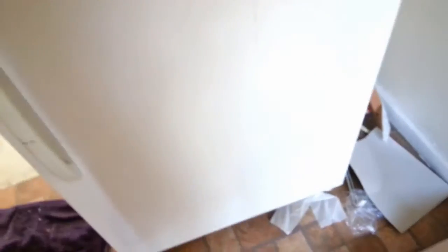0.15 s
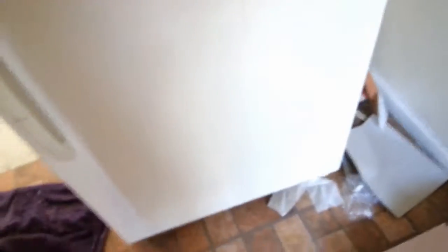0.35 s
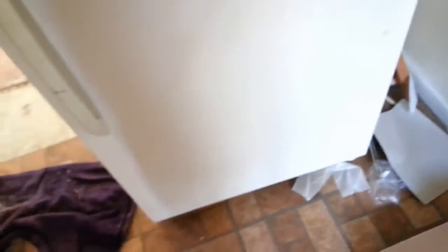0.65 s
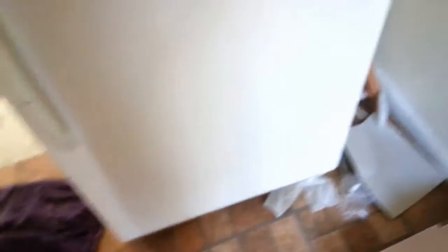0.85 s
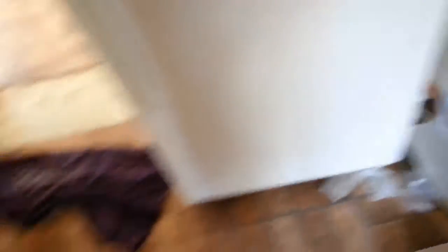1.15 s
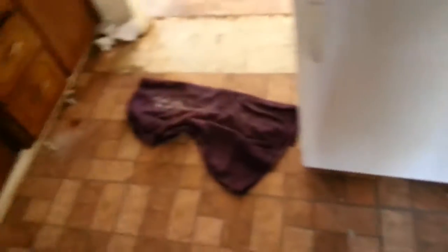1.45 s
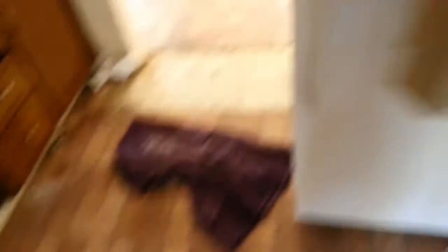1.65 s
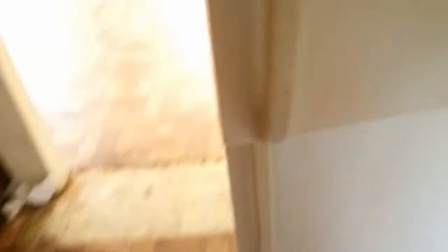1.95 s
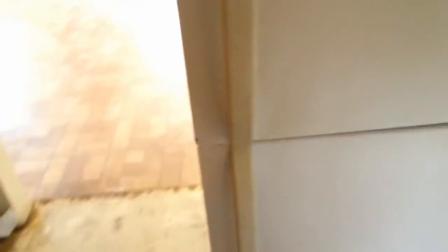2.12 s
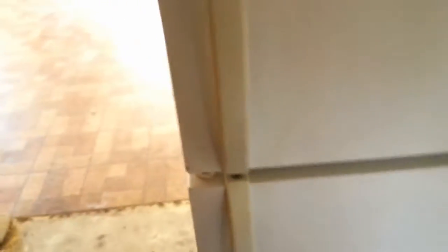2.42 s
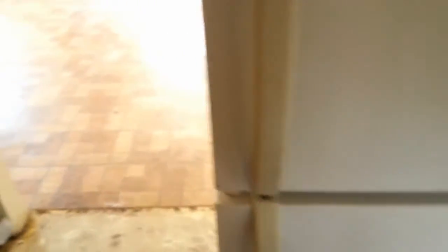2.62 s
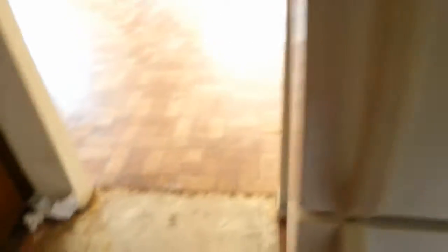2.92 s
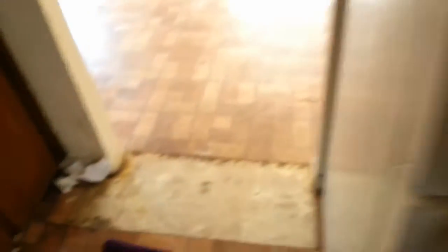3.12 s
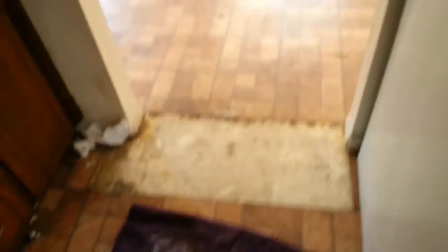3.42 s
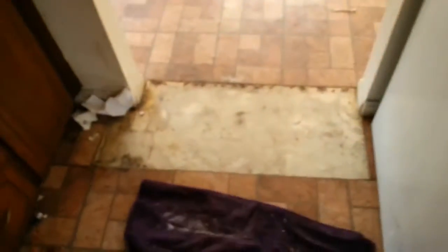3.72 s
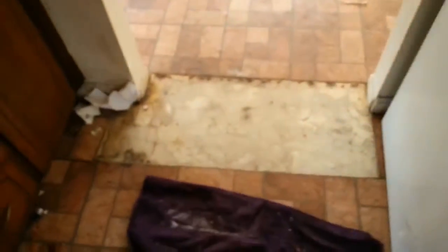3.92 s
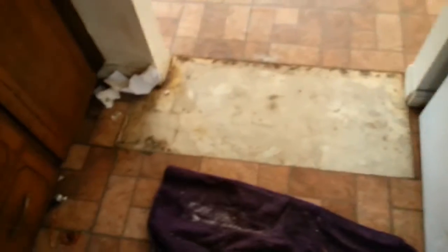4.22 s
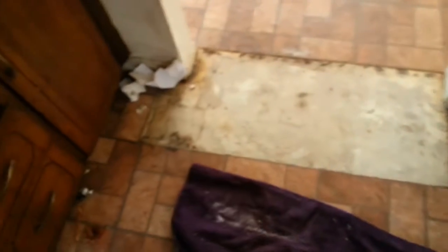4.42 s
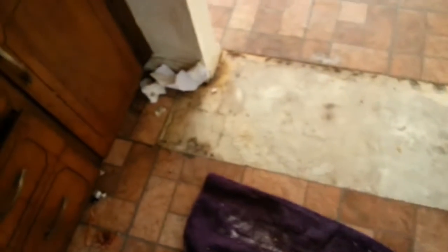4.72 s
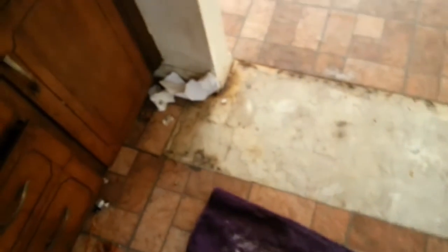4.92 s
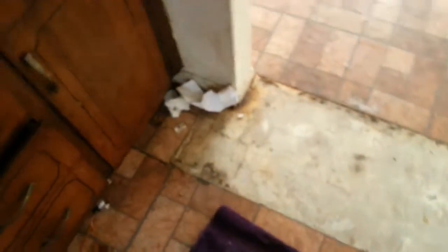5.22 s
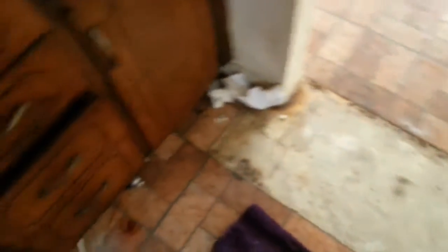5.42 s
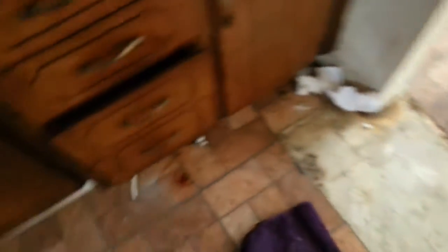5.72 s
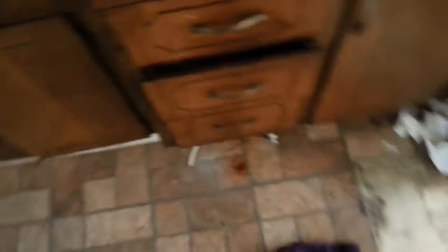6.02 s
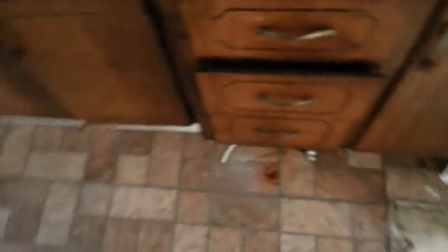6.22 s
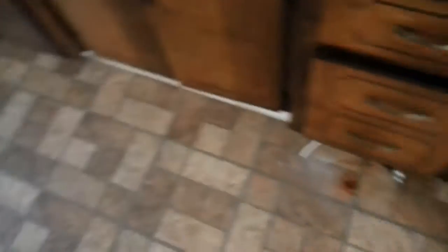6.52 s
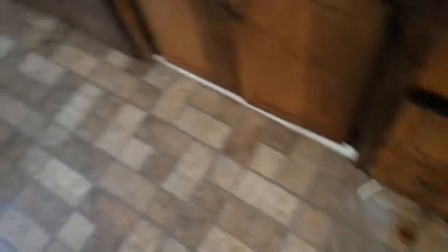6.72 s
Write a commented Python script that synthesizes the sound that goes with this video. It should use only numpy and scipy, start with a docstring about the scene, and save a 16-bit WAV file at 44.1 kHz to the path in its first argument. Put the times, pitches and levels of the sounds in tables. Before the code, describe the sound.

A refrigerator door knocks against its stop at arm's length and its plastic shelves clatter. A few soft bumps follow. About two seconds later the door slams shut, much louder, and the steel panels ring briefly in the bare kitchen. After that, someone shifts about on the vinyl floor with faint scuffs, small ticks and sleeve rustle over a low room hum.

```python
"""Fridge door in a bare kitchen

From arm's length, the door knocks against its stop and its plastic shelves clatter. Two seconds
later it slams on the steel cabinet, setting the panels and the room ringing. Someone shifts about
on the vinyl floor: faint bumps, scuffs, ticks and sleeve rustle over a low rumble and room tone."""
import sys
import numpy as np
from scipy import signal
from scipy.fft import rfft, irfft, next_fast_len
from scipy.io import wavfile

SR = 44100
rng = np.random.default_rng(int(sys.argv[2]) if len(sys.argv) > 2 else 0)


def dump_mix(stems):
    """Bounce the given channels to the path in sys.argv[1] as a 16-bit WAV at rate SR."""
    frames = np.atleast_2d(stems).T  # one column per channel
    limited = np.clip(frames, -1, 1)  # hard clip at full scale
    pcm = np.round(limited * 32767).astype(np.int16)
    wavfile.write(sys.argv[1], SR, pcm)


N = 302159
TAIL_SIZE = 9 * 2 ** 12   # samples for one hit and its decay

# How alike the room sounds left and right. Each row: frequency in Hz, correlation.
STEREO_LIKENESS = [(50, 0.53), (130, 0.74), (290, 0.7), (640, 0.45), (1400, 0), (14000, 0.011)]


def door_slam():
    """The door lands on the cabinet and settles; the steel panels ring on."""
    # The landing and its rebounds. Each row: start in seconds, level in dB.
    hits = [(2.3002, -2), (2.3020, 12.5), (2.3105, 0.5), (2.3158, 0), (2.3448, 2)]
    # Full-bodied tone of the slam. Each row: frequency in Hz, relative level in dB.
    colour = [(30, -17), (55, -17), (110, -9), (170, 2), (270, -1.5), (370, 0), (460, -1.5), (780, 1),
              (1080, -2), (1600, -8), (2200, -9.5), (3300, -13.5), (4100, -17.5), (5200, -24.5),
              (6100, -29), (14000, -43)]
    # Steel panel modes. Each row: frequency in Hz, level in dB, seconds to fall 60 dB.
    steel_modes = [(218, -8, 1), (270, -19, 0.72), (363, -8, 0.79), (415, 7.5, 0.32), (536, 5, 0.44),
                   (610, -7, 0.42), (670, -14, 0.4), (717, -3, 0.93), (720, -3, 0.6), (780, 1, 0.62),
                   (989, 12, 0.29), (1090, -2, 0.27), (1050, -1, 0.52), (1260, 3.5, 0.69),
                   (2380, -10.5, 0.9), (3200, -18, 0.36)]
    slam = impacts(hits, colour, shake_db=1.5, shake_t60=0.35, room_db=1, soft_hz=8900, spread_s=0.00043)
    return slam + ringing(hits, steel_modes, ring_db=-42)


def door_stop():
    """The door meets its stop with a quick double contact, heard as one knock."""
    # Each row: start in seconds, level in dB.
    hits = [(0.1741, -2.5), (0.1750, 5)]
    # Hard midrange tone of the knock. Each row: frequency in Hz, relative level in dB.
    colour = [(40, -14.5), (200, -12), (540, -8), (850, -0.5), (1150, 1), (1800, -7), (2150, -8),
              (2600, -6), (3700, -21), (4600, -12), (5250, -11), (6200, -27), (14000, -34.5)]
    return impacts(hits, colour, shake_db=3.5, shake_t60=0.45, room_db=-6, soft_hz=6000, spread_s=0.000636)


def shelf_clatter():
    """The door shelves jump and settle, ringing the plastic."""
    # Each row: start in seconds, level in dB.
    hits = [(0.2245, 4), (0.2275, 0), (0.2318, -12), (0.2374, 3), (0.2495, -6.5), (0.272, -21),
            (0.345, -10.5), (0.437, -32)]
    # Broad tone of the clatter. Each row: frequency in Hz, relative level in dB.
    colour = [(30, -54), (60, -13), (130, 0), (430, -3), (570, -0.5), (780, -5.5), (1500, -1.5), (1830, -3),
              (2150, -0.5), (3300, -6.5), (4500, -12.5), (9400, -18), (14000, -30.5)]
    # Shelf and door liner modes. Each row: frequency in Hz, level in dB, seconds to fall 60 dB.
    plastic_modes = [(317, -5, 1), (555, 8, 0.3), (950, -8, 0.39), (1361, 3.5, 0.57), (1470, -4, 0.43),
                     (2100, -17, .45), (2350, 3, 0.35), (2800, -13, 0.27), (3440, 3, 0.2)]
    clatter = impacts(hits, colour, shake_db=5.5, shake_t60=0.25, room_db=-4,
                      soft_hz=4000, spread_s=0.00054)
    return clatter + ringing(hits, plastic_modes, ring_db=-38)


def hinge():
    """The hinge rubs with a thin hiss as the door swings."""
    # Each row: moment of greatest speed in seconds, level in dB, swell in seconds.
    swings = [(0.98, -60, 0.18), (1.94, -67, .4)]
    # A narrow treble band. Each row: frequency in Hz, relative level in dB.
    colour = [(3000, -41), (4400, -14), (4900, -11), (5400, -28), (7000, -46)]
    return movement(swings, fade_s=0.078) * rubbing(colour, flutter_db=1.5)


def bumps():
    """Door, feet and floor bump softly: each touch eases in and wakes one broad resonance."""
    # Each row: start in seconds, level in dB, pitch in Hz, octaves from the peak to 7 dB down.
    touches = [(0.055, -13, 1020, 1.2), (0.078, -16, 322, 0.53), (0.346, -17, 134, 1.06),
               (0.656, -16, 220, 0.38), (0.671, -25, 840, 1.2), (0.970, -22.5, 530, 0.65),
               (1.812, -27.5, 290, 0.98), (1.95, -32.5, 1580, 0.56), (2.143, -22, 423, 0.93),
               (4.171, -30.5, 396, 1.14), (4.72, -33, 440, 0.91), (6.384, -41, 1380, 0.51)]
    hump_db = [-48, -24, -7, 0, -7, -24, -48]
    out, echoes = np.zeros((2, N)), from_db(-1.5) * kitchen_tail()
    for start_s, db, hz, octaves in touches:
        resonance = np.c_[hz * 2 ** (octaves * np.arange(-3, 4)), hump_db]
        touch = contact(shake_db=8, shake_t60=0.27, soft_hz=1200) * (1 - decay(0.01))
        add(out, start_s, from_db(db) * coloured(touch + echoes, resonance))
    return out


def floor_ticks():
    """Small sharp contacts crackle underfoot."""
    # Each row: start in seconds, level in dB.
    hits = [(3.279, -22), (4.272, -25), (4.308, -28), (5.178, -32), (5.186, -25), (5.212, -16),
            (5.221, -9.5), (6.188, -31), (6.284, -19), (6.295, -16), (6.302, -22), (6.311, -20),
            (6.320, -18), (6.3255, -23)]
    # Bright tone of a tick. Each row: frequency in Hz, relative level in dB.
    colour = [(60, -49), (400, -0.5), (900, -1.5), (1600, 6), (2400, 7.5), (3300, 7), (4600, 4.5),
              (5700, -7), (9500, -10), (14000, -46)]
    return impacts(hits, colour, shake_db=1.5, shake_t60=0.038, room_db=-5,
                   soft_hz=7000, spread_s=0.00021)


def sole_scuffs(fade_s=0.16, rasp_db=6.5, rasp_octaves=0.59):
    """A sole slides, gathers pressure and lets go with its own rasp; a faint shuffle fills the gaps."""
    # Each row: peak time in seconds, level in dB, swell in seconds, rasp pitch in Hz.
    slides = [(2.96, -65, .06, 2000), (3.283, -44, 0.027, 3460), (4.275, -49.5, 0.092, 2030),
              (4.61, -55.5, 0.17, 2830), (4.725, -54.5, 0.049, 1230), (5.182, -45.5, 0.014, 2240),
              (5.225, -58, 0.052, 3000), (5.29, -70, 0.12, 1720), (5.41, -44, 0.22, 1450),
              (6.108, -58.5, 0.04, 1100), (6.30, -49, .05, 4200), (6.395, -53.5, 0.12, 2500)]
    # Sole on vinyl. Each row: frequency in Hz, relative level in dB.
    colour = [(150, -18), (350, -6), (800, 1.5), (1400, -2.5), (2000, -3), (2600, -7), (4600, -7.5),
              (5700, -17), (14000, -19)]
    friction = rubbing(colour, flutter_db=3)
    out = movement([], fade_s, rest_db=-60) * friction
    for peak_s, db, swell_s, hz in slides:
        hump = np.c_[hz * 2 ** (rasp_octaves * np.array([-1, 0, 1])), [0, rasp_db, 0]]
        rasp = unit_energy(coloured(friction, hump)) * np.sqrt(N)
        out += movement([(peak_s, db, swell_s)], fade_s) * rasp
    return out


def sleeve_rustle():
    """Sleeves brush close by; the cloth is never quite at rest."""
    # Each row: peak time in seconds, level in dB, swell in seconds.
    brushes = [(0.44, -47.5, 0.039), (0.61, -57.5, 0.44), (1.96, -57.5, .35), (2.615, -42, 0.034),
               (3.29, -60, 0.037), (4.62, -52.5, 0.062), (5.05, -52.5, 0.074), (5.20, -50.5, 0.074),
               (5.475, -47.5, 0.35), (6.295, -54.5, 0.1), (6.41, -67, .05)]
    # Airy cloth hiss. Each row: frequency in Hz, relative level in dB.
    colour = [(1500, 5.5), (4500, 5), (6000, -3), (8500, -0.5), (14000, -5)]
    return movement(brushes, fade_s=0.17, rest_db=-64) * rubbing(colour, flutter_db=3, flutter_count=200)


def floor_rumble():
    """The floor rumbles under shifting weight."""
    # Each row: peak time in seconds, level in dB, swell in seconds.
    treads = [(0.69, -55, 0.086), (2.0, -56, 0.43), (3.7, -67, 0.4), (4.3, -67.5, 0.46), (5.85, -65, 0.28)]
    # Deep tone of the floor. Each row: frequency in Hz, relative level in dB.
    colour = [(15, -54), (35, -10), (55, 8), (95, 9), (140, -12), (300, -42)]
    return movement(treads, fade_s=0.76, rest_db=-72, fidget=0.091) * rubbing(colour, flutter_db=1.5)


def kitchen_tail(build_s=0.0033):
    """Dense wall echoes build up, then die away, the treble first."""
    # Each row: frequency in Hz, seconds to fall 60 dB.
    reverb_times = [(100, 0.55), (1200, 0.96), (3200, 0.79), (6500, 0.73), (13000, 0.31)]
    noise, hz = rfft(diffuse(TAIL_SIZE)), bins(TAIL_SIZE)
    centres, t60s = np.transpose(reverb_times)
    bands = [at_hz(np.c_[centres, weights], hz) for weights in np.eye(len(centres))]
    tail = sum(irfft(noise * band) * decay(t60) for band, t60 in zip(bands, t60s))
    return unit_energy(tail * (1 - decay(np.log(1000) * build_s)))


def room_tone():
    """A steady bed of low, diffuse noise."""
    # Each row: frequency in Hz, relative level in dB.
    colour = [(20, -44), (60, -35), (100, -7), (145, -3), (185, -7.5), (228, 0.5), (262, -7), (300, -4),
              (420, -10), (700, -12.5), (1000, -16.5), (2400, -21), (4700, -25.5), (5800, -30.5),
              (14500, -28.5)]
    return from_db(-53.5) * coloured(diffuse(N), colour)


def impacts(hits, colour, shake_db, shake_t60, room_db, soft_hz, spread_s):
    """A run of contacts on one object, each with its own shake and room echoes."""
    out = np.zeros((2, N))
    for start_s, db in hits:
        hit = contact(shake_db, shake_t60, soft_hz, spread_s) + from_db(room_db) * kitchen_tail()
        add(out, start_s, from_db(db) * hit)
    return coloured(out, colour)


def contact(shake_db, shake_t60, soft_hz, spread_s=0.0009, lag_s=0.00011):
    """One touch: a rounded click that reaches the right side first, and the brief shake it starts."""
    hz = bins(TAIL_SIZE)
    # Low bending waves travel slower; spread_s is the delay at 1 kHz.
    bending_phase = 4 * np.pi * spread_s * np.sqrt(hz * 1000)
    lag_phase = 2 * np.pi * hz * lag_s * np.array([[1], [0]])
    click = irfft(np.exp(-1j * (bending_phase + lag_phase)) / (1 + 1j * hz / soft_hz))
    shake = unit_energy(diffuse(TAIL_SIZE) * decay(shake_t60))
    return click * decay(1) + from_db(shake_db) * shake


def ringing(hits, modes, ring_db):
    """The hardest hit sets the panels ringing; higher modes reach the two sides further out of step."""
    ring, t = np.zeros((2, TAIL_SIZE)), np.arange(TAIL_SIZE) / SR
    for hz, mode_db, t60 in modes:
        phase_gap = np.arccos(at_hz(STEREO_LIKENESS, hz)) * rng.choice([-1, 1])
        phase = phase_gap * np.array([[0.5], [-0.5]]) + rng.uniform(0, 2 * np.pi)
        ring += from_db(mode_db) * np.sin(2 * np.pi * hz * t + phase) * decay(t60)
    out = np.zeros((2, N))
    start_s, db = max(hits, key=lambda hit: hit[1])
    add(out, start_s, from_db(db + ring_db) * ring * (1 - decay(0.062)))   # soft attack
    return out


def rubbing(colour, flutter_db, flutter_count=400):
    """Friction noise whose level flutters as the surfaces catch."""
    catch = np.interp(np.arange(N), np.linspace(0, N, flutter_count), rng.standard_normal(flutter_count))
    return from_db(flutter_db * catch) * coloured(diffuse(N), colour)


def movement(strokes, fade_s, rest_db=-120, fidget=0.87):
    """Envelope: each stroke rises 20 dB per swell time, falls 20 dB per fade_s; fidgets fill the gaps."""
    # Restlessness between moves. Each row: time in seconds, level in dB before scaling by fidget.
    restlessness = [(0.7, 2), (1.25, -23.5), (1.7, -15), (2.2, 1.5), (2.9, 2.5), (3.6, -5.5), (4.05, -15),
                    (4.4, -15), (5.3, -2), (5.85, -19), (6.5, -9)]
    t = np.arange(N) / SR
    power = from_db(rest_db + fidget * np.interp(t, *np.transpose(restlessness))) ** 2
    for peak_s, db, swell_s in strokes:
        drop_db = 20 * np.maximum((peak_s - t) / swell_s, (t - peak_s) / fade_s)
        power += from_db(db - drop_db) ** 2
    return np.sqrt(power)


def diffuse(size):
    """Stereo white noise from all directions: alike in the bass, unrelated in the treble."""
    padded = 2 * next_fast_len(size // 2 + 1)
    mid, side = rfft(rng.standard_normal((2, padded)))
    alike = at_hz(STEREO_LIKENESS, bins(padded))
    spectrum = np.sqrt((1 + alike) / 2) * mid + np.sqrt((1 - alike) / 2) * side * [[1], [-1]]
    return irfft(spectrum)[:, :size]


def coloured(x, colour, size=8192):
    """Minimum-phase EQ that keeps the power of white noise."""
    cepstrum = irfft(np.log(from_db(at_hz(colour, bins(size)))))
    cepstrum[1:size // 2] *= 2
    cepstrum[size // 2 + 1:] = 0
    response = unit_energy(irfft(np.exp(rfft(cepstrum))))
    return signal.oaconvolve(x, response[None], axes=1)[:, :x.shape[1]]


def decay(t60):
    """Envelope that falls 60 dB in t60 seconds."""
    return np.exp(-np.log(1000) * np.arange(TAIL_SIZE) / SR / t60)


def from_db(db):
    """Decibels to gain."""
    return 10 ** (np.asarray(db) / 20)


def at_hz(points, hz):
    """Read a curve on a log-frequency axis."""
    known_hz, values = np.transpose(points)
    return np.interp(np.log(hz + 0.0011), np.log(known_hz), values)


def bins(size):
    """Frequencies of a real spectrum, in Hz."""
    return np.arange(size // 2 + 1) * SR / size


def unit_energy(x):
    """Scale to an average energy of one per channel."""
    return x / np.sqrt(np.mean(np.sum(x ** 2, axis=-1)))


def add(track, start_s, sound):
    """Mix a sound into the track at start_s."""
    start = round(start_s * SR)
    track[:, start:start + sound.shape[1]] += sound[:, :N - start]


def scene():
    """The door up front, small movements around it and room tone underneath."""
    door = door_stop() + shelf_clatter() + door_slam() + hinge()
    soft_bumps = bumps()
    feet = (floor_ticks() + sole_scuffs()) * from_db([[0.47], [-0.47]])   # a little to the left
    return door + soft_bumps + feet + sleeve_rustle() + floor_rumble() + room_tone()


def record(dry):
    """A small microphone loses the deepest bass; peaks are clipped and the top is rolled off."""
    low_cut = signal.butter(3, 40, "high", fs=SR, output="sos")
    high_cut = signal.ellip(12, 0.1, 80, 14700, fs=SR, output="sos")
    clipped = np.clip(signal.sosfilt(low_cut, dry), -0.96, 0.96)
    return signal.sosfilt(high_cut, clipped)


dry = scene()
out = record(dry)
dump_mix(out)
```